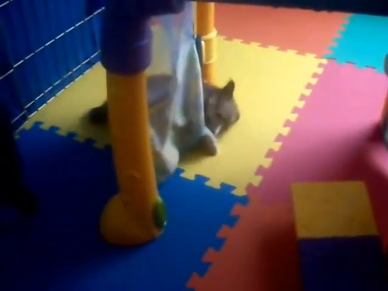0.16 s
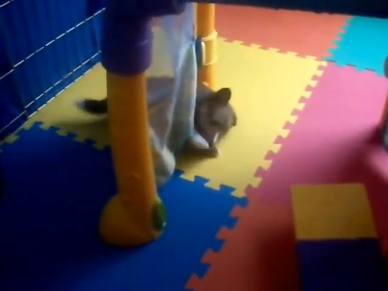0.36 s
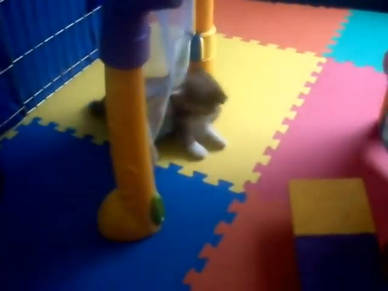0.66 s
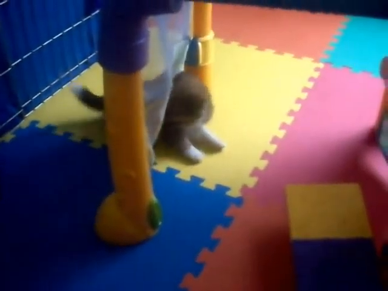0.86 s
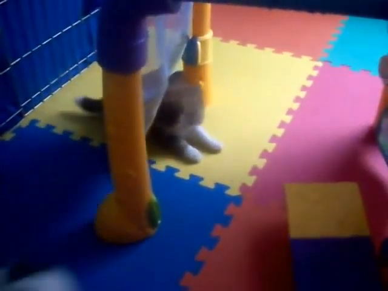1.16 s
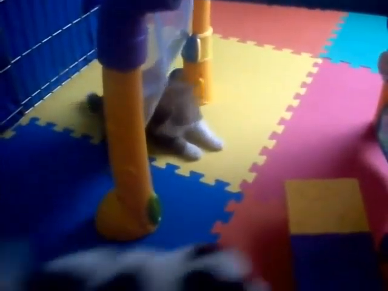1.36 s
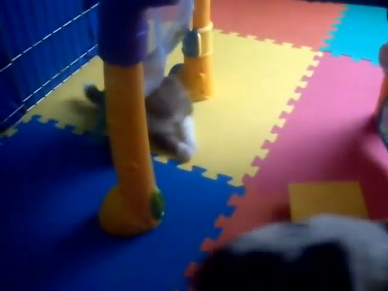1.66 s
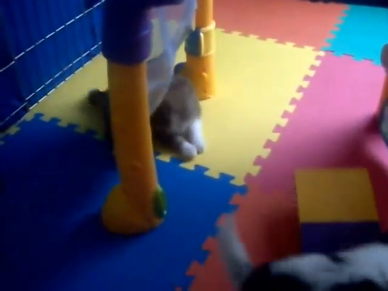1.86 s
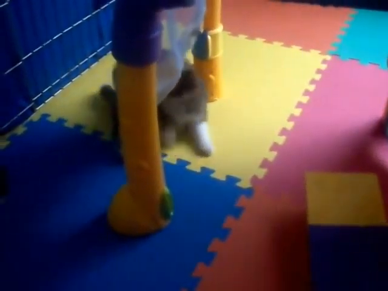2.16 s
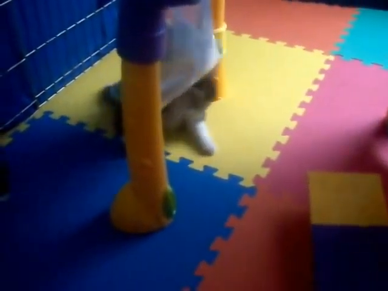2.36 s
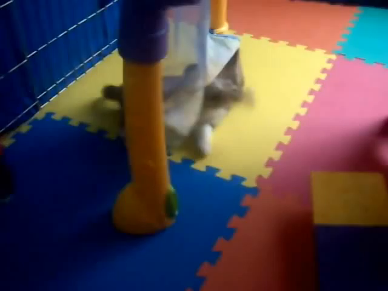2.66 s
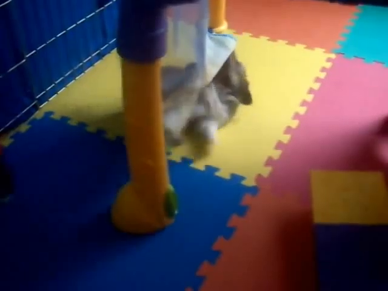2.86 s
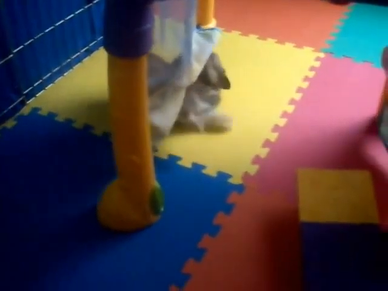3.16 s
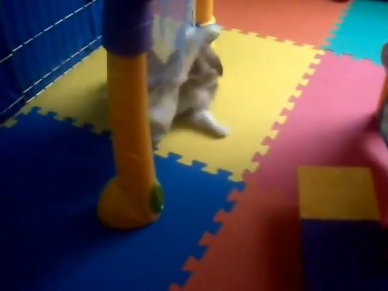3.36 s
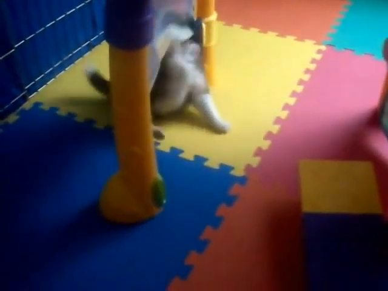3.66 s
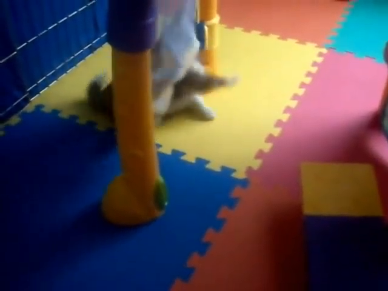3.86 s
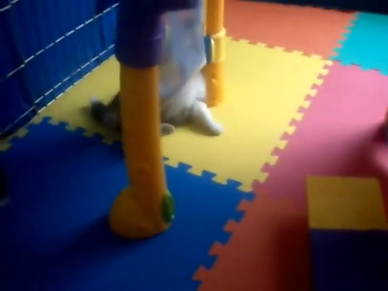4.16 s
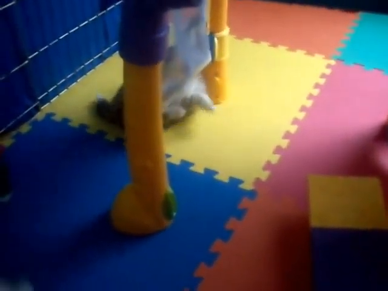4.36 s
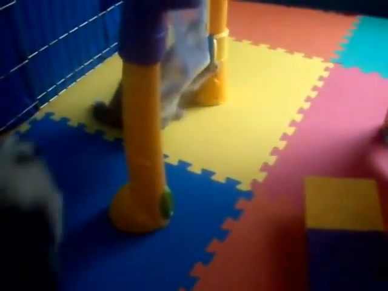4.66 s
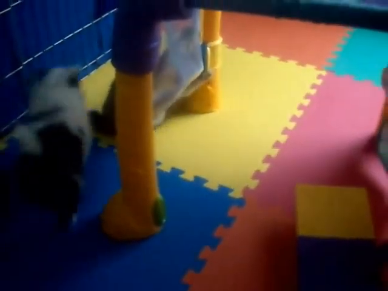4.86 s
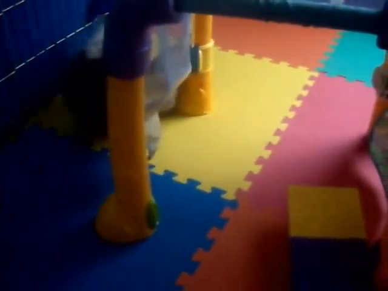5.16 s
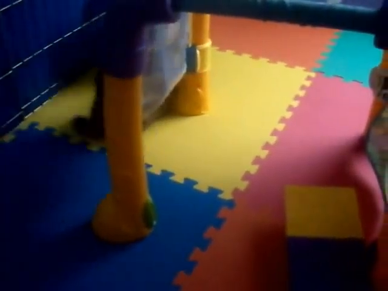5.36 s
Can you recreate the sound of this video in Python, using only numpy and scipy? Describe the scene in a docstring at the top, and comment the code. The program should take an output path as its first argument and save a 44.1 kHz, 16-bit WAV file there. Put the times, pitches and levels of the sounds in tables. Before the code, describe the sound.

Faint rubbing and light pats of paws on foam, a ringing metallic clink across the room, tiny squeaks of rubbed foam, then a sudden hollow double knock, by far the loudest sound. Cloth net rasps and snaps, a claw zips over mesh, and bumps follow in clusters before thinning out. Live indoor echo, low hiss in the microphone.

```python
"""Scuffing and pats of paws on foam mats in a small, bare room, then one clink of metal: puppies tussle.
Rubbing is noise made of tiny slips; pats and claw ticks are decaying showers of clicks.
Something hollow is knocked twice: filtered blows, sharp cracks and decaying sine modes.
Foam squeaks faintly (wandering sines), a cloth net on a plastic frame rasps, snaps and is zipped by a claw.
Dense wall echoes follow the contacts, over quiet room tone and microphone hiss (coloured noise) and a faint hum."""
import sys
import numpy as np
from scipy import signal
from scipy.fft import rfft, irfft
from scipy.io import wavfile
from scipy.ndimage import uniform_filter1d

SR = 44100
rng = np.random.default_rng(int(sys.argv[2]) if len(sys.argv) > 2 else 0)


def generate_wav(sig):
    """Save sig (samples, or channels by samples) to the path in sys.argv[1] as 16-bit PCM at SR."""
    pcm = np.round(np.clip(np.atleast_2d(sig).T, -1, 1) * 32767).astype(np.int16)
    wavfile.write(sys.argv[1], SR, pcm)


N = 242991  # samples


def undb(db):
    """Decibels to gain."""
    return 10 ** (np.asarray(db) / 20)


def unit(x):
    """Scale to rms 1."""
    return x / np.sqrt(np.mean(x ** 2) + 1e-20)


def on_log(hz, points):
    """Interpolate (f/Hz, value) points on a log-frequency axis."""
    point_hz, values = np.transpose(points)
    return np.interp(np.log(np.maximum(hz, 1)), np.log(point_hz), values)


def colour(x, points):
    """Shape a steady sound with the spectrum of the points, at rms 1."""
    gain = undb(on_log(np.fft.rfftfreq(len(x), 1 / SR), points))
    return unit(irfft(rfft(x) * gain, len(x)))


def impulse(points, size=2048):
    """Minimum-phase click with this spectrum, at energy 1."""
    magnitude = undb(on_log(np.fft.rfftfreq(size, 1 / SR), points))
    cepstrum = irfft(np.log(magnitude))
    # fold the cepstrum onto positive time: most compact causal click
    cepstrum[1:size // 2] *= 2
    cepstrum[size // 2 + 1:] = 0
    return unit(irfft(np.exp(rfft(cepstrum)))) / np.sqrt(size)


def fade(t60_s):
    """One second of exponential decay, falling 60 dB in t60_s."""
    return np.exp(-np.log(1000) * np.arange(SR) / SR / max(t60_s, 1e-3))


def burst(points, t60_s):
    """Contact as a decaying shower of tiny clicks, with the energy of 5 ms at rms 1."""
    shower = rng.standard_normal(SR) * fade(t60_s)
    return unit(signal.fftconvolve(shower, impulse(points))[:SR]) * np.sqrt(.005)


def ring(modes):
    """Decaying sine modes set off together, each reaching the microphone in its own phase."""
    t = np.arange(SR) / SR
    out = np.zeros(SR)
    for hz, db, t60_s in modes:
        out += undb(db) * fade(t60_s) * np.sin(2 * np.pi * (hz * t + rng.random()))
    return out


def add(out, start_s, x):
    """Mix x into out from start_s."""
    i = int(start_s * SR)
    out[i:i + len(x)] += x[:N - i]


def walk(rate_hz):
    """Random levels held 1 / rate_hz and smoothed twice; rms 1."""
    hold = int(SR / rate_hz)
    steps = np.repeat(rng.standard_normal(N // hold + 1), hold)
    return unit(uniform_filter1d(uniform_filter1d(steps, hold), hold)[:N])


# Room tone and hiss spectrum: f/Hz, level/(dB per Hz), relative
ROOM_TONE = [(15, -44), (25, -3.5), (119, -7), (188, -17.5), (240, -3), (281, -10.5), (582, -5), (648, 2),
             (703, -4.5), (1170, -5.5), (1750, -13.5), (2230, -13), (3260, -18.5), (13900, -23),
             (15500, -23.5)]
ROOM_TONE_DB = -62.5


def background(hum_hz=643, hum_db=-73, waver=0.01166):
    """Steady coloured noise for room tone and hiss, plus a faint sine hum wavering in pitch and level."""
    tone = undb(ROOM_TONE_DB) * colour(rng.standard_normal(N), ROOM_TONE)
    pitch_hz = hum_hz * (1 + waver * walk(25.17))
    hum = np.sin(2 * np.pi * np.cumsum(pitch_hz) / SR) * undb(hum_db + 2 * walk(5.63))
    return tone + hum


# Wall decay by frequency: f/Hz, t60/s
ROOM_T60 = [(100, 0.56), (500, 0.51), (2000, 0.59), (6000, 0.38), (15000, 0.58)]


def echoes(build_s=0.0015):
    """Dense wall echoes of one click, energy 1: built up within ms, decaying at a rate set by frequency."""
    spectrum, hz = rfft(rng.standard_normal(SR)), np.fft.rfftfreq(SR, 1 / SR)
    centres_hz = [f for f, _ in ROOM_T60]
    tail = np.zeros(SR)
    for share, (_, t60_s) in zip(np.eye(len(centres_hz)), ROOM_T60):
        band = irfft(spectrum * on_log(hz, list(zip(centres_hz, share))), SR)
        tail += band * fade(t60_s)
    build = 1 - np.exp(-(np.arange(SR) / SR / build_s) ** 2)
    return unit(tail * build) / np.sqrt(SR)


def room(x):
    """Wall response to x, with a fresh random echo pattern on each call."""
    return signal.fftconvolve(x, echoes())[:len(x)]


def strike(points, room_db, smear_hz=1000):
    """Clean blow (energy of 5 ms at rms 1) plus echoes, smeared by an all-pass."""
    x = np.zeros(SR)
    add(x, 0, impulse(points) * np.sqrt(.005 * SR))
    # bending waves travel at different speeds, which spreads the first peak
    _, poles = signal.iirpeak(smear_hz, 1, fs=SR)
    return signal.lfilter(poles[::-1], poles, x) + undb(room_db) * room(x)


# Rubbed-foam squeaks and scrapes: t/s, length/s, pitch f/Hz, pitch spread width/Hz, level/dB
SQUEAKS = [(.81, 0.11, 2424, 162.5, -66), (.865, 0.046, 2806, 257, -60.5), (.902, 0.051, 2580, 49.6, -55.5),
           (1.167, 0.043, 2300, 796, -54.5), (2.279, .22, 2421, 420, -63), (2.886, .033, 2790, 398, -58),
           (3.245, 0.037, 2400, 604, -60), (3.341, 0.083, 778, 299, -56)]


def squeaks(room_db=-5):
    """Rubbed foam sticks and slips: even slips give a thin note, uneven ones a rough scrape."""
    out = np.zeros(N)
    for start_s, length_s, pitch_hz, width_hz, db in SQUEAKS:
        n = int(length_s * SR)
        hz = pitch_hz + width_hz / 2 * walk(2 * width_hz)[:n]
        note = np.sqrt(2) * np.sin(2 * np.pi * np.cumsum(hz) / SR)
        add(out, start_s, undb(db) * np.hanning(n) * note)
    return out + undb(room_db) * room(out)


# Claw zipping over the net mesh, one event: t/s, length/s, thread rate/Hz, level/dB
ZIP = (3.9915, .013, 1000, -45)
# Spectrum of one plucked thread: f/Hz, level/(dB per Hz), relative
THREAD = [(400, -21), (900, -9), (2100, 2), (4000, 1), (6000, 0), (7000, -6), (8500, 3), (10500, -11),
          (12400, -9), (15000, -29.5)]


def claw_zip(room_db=-5):
    """Claw plucks one thread after another, unevenly and so fast that the ticks fuse."""
    start_s, length_s, rate_hz, db = ZIP
    out, n = np.zeros(N), int(length_s * SR)
    speed_hz = rate_hz * (1 + .06 * walk(rate_hz)[:n])
    plucks = np.diff(np.floor(np.cumsum(speed_hz) / SR), prepend=0)
    threads = unit(signal.fftconvolve(plucks, impulse(THREAD))[:n])
    add(out, start_s, undb(db) * np.hanning(n) * threads)
    return out + undb(room_db) * room(out)


# Net snapping taut or nicked by a claw: t/s, level/dB
SNAPS = [(2.587, -53.5), (2.781, -58), (3.258, -65), (3.284, -62), (3.92, -54.5), (4.077, -61),
         (4.215, -57.5), (4.82, -66)]
# Cloth spectrum, also the hiss of rubbing(): f/Hz, level/(dB per Hz), relative
CLOTH = [(1500, -28), (4500, -6), (6200, -2.5), (9000, 0.5), (11500, -7.5), (15000, -4)]


def snaps(t60_s=.03, room_db=-4):
    """Net cloth jerks: short, crisp noise bursts."""
    out = np.zeros(N)
    for start_s, db in SNAPS:
        add(out, start_s, undb(db) * burst(CLOTH, t60_s))
    return out + undb(room_db) * room(out)


# Light claw ticks: t/s, level/dB
TICKS = [(.822, -57), (1.019, -56.5), (1.115, -54.5), (1.18, -53.5), (2.297, -59), (4.443, -54.5)]
# Claw click spectrum, also in pats(): f/Hz, level/(dB per Hz), relative
CLAW = [(900, -25), (2100, 10), (3200, 3.5), (4500, 1.5), (7000, -12), (10000, -14), (15000, -18)]


def ticks(t60_s=0.042, room_db=-4):
    """Claw touches down with no weight behind it."""
    out = np.zeros(N)
    for start_s, db in TICKS:
        add(out, start_s, undb(db) * burst(CLAW, t60_s))
    return out + undb(room_db) * room(out)


def friction(points, slips_per_s, spread_db, flutter_db):
    """Many tiny slips of uneven size, coming in flurries; coloured, at rms 1."""
    sizes = undb(np.minimum(rng.exponential(size=N), 5) * spread_db)
    slips = rng.standard_normal(N) * (rng.random(N) < slips_per_s / SR) * sizes
    return colour(slips * undb(flutter_db * walk(70)), points)


# Rubbing strokes: peak t/s, nominal length/s, relative level/dB, net over foam/dB
STROKES = [(0.023, 0.13, -58, 1.5), (0.387, 0.29, -63, 4), (0.902, 0.28, -66, -2.5), (1.192, .06, -59, 3.5),
           (1.298, 0.23, -62.5, -1.5), (1.725, 0.097, -58, 5), (2.242, 0.12, -58, 0),
           (2.41, 0.12, -65.5, -15), (2.598, 0.24, -64.5, 13), (2.621, 0.095, -58.5, -11),
           (2.823, 0.25, -56, -10.5), (3.294, 0.081, -67.5, 12), (3.607, 0.17, -63, 12),
           (3.933, 0.085, -57, 3.5), (4.036, .11, -56, -0.5), (4.239, 0.1, -60.5, 6.5),
           (4.392, 0.057, -57.5, -3), (4.51, 0.11, -65.5, 9), (4.764, 0.13, -66, -15),
           (4.826, 0.025, -62.5, 7), (5.157, 0.32, -72, -9.5)]
# Foam scuff spectrum: f/Hz, level/(dB per Hz), relative
SCUFF = [(150, -12.5), (450, 1), (700, -1.5), (1250, 3), (1700, -8), (2400, -10), (3200, -47),
         (6000, -40.5)]
# Net rasp spectrum: f/Hz, level/(dB per Hz), relative
RASP = [(700, -12), (1500, -0.5), (2400, 3.5), (3200, -5), (4500, -5), (6500, -19.5), (12000, -34)]
RISE_SHARE = 0.46  # part of stroke length spent swelling
HISS_DB, HISS_DB_PER_NET_DB = -8, 1
# faint rubbing that never quite stops; levels before rub_db
FIDGET_DB, FIDGET_SWING_DB, FIDGET_RATE_HZ = -74.5, 2, 5.3


def rubbing(rub_db=-4, room_db=-2):
    """Strokes swell and die: bodies scuff foam; the more the net is caught, the more it rasps and hisses."""
    t = np.arange(N) / SR
    scuff = friction(SCUFF, 1500, 3, 2)
    rasp = friction(RASP, 2000, 2.7, 2)
    hiss = friction(CLOTH, 5000, 3, 1.2)
    fidget = undb(FIDGET_DB + FIDGET_SWING_DB * walk(FIDGET_RATE_HZ))
    out = fidget * (scuff + rasp + undb(HISS_DB) * hiss)
    for peak_s, length_s, db, net_db in STROKES:
        rise_s, fall_s = length_s * RISE_SHARE, length_s * (1 - RISE_SHARE)
        rising, falling = ((t - peak_s) / rise_s) ** 2, np.abs((t - peak_s) / fall_s) ** 1.5
        swell = np.exp(-np.where(t < peak_s, rising, falling))
        mix = undb(-net_db / 2) * scuff + undb(net_db / 2) * rasp
        mix += undb(HISS_DB + HISS_DB_PER_NET_DB * net_db) * hiss
        out += undb(db) * swell * mix
    return undb(rub_db) * (out + undb(room_db) * room(out))


# Paw pats and bumps against the frame: t/s, relative level/dB, pitch f/Hz, relative weight level/dB
PATS = [(.275, -47.5, 1120, -18), (.718, -52, 794, -11), (1.277, -52.5, 1130, -7),
        (1.471, -49.5, 1030, -12), (1.634, -51.5, 1270, -8), (1.701, -51, 1100, -18),
        (2.586, -47, 600, -11), (2.700, -46.5, 1100, -0.5), (2.784, -42, 1300, -1),
        (2.829, -45.5, 1230, -4), (2.990, -50.5, 1230, 0), (3.510, -50, 940, -10), (3.739, -51.5, 754, -9),
        (3.905, -48, 753, -3), (4.066, -43.5, 1280, -12), (4.360, -50.5, 1400, -7), (4.442, -43, 630, -9.5),
        (4.685, -48, 760, -8.5), (4.724, -52.5, 564, -3), (4.747, -45.5, 645, -5), (4.990, -59, 945, -8),
        (5.042, -54, 940, -17), (5.254, -55.5, 945, -22), (5.307, -53.5, 700, -10)]
# Soft slap spectrum: f/Hz, level/(dB per Hz), relative
PAD = [(150, -19), (380, -11.5), (520, -1), (850, 1), (1300, 0), (1700, -11.5), (2500, -18), (4000, -34.5)]
# Thump spectrum: f/Hz, level/(dB per Hz), relative
WEIGHT = [(40, -27), (90, -6), (160, 2), (250, -0.5), (380, 7.5), (600, 8.5), (1200, -47)]
PAT_T60_S, WEIGHT_DB_PER_DOUBLING = 0.041, 16.5  # decay at weight 0 dB; weight rise that doubles it
PAT_ROOM_DB, ROOM_DB_PER_WEIGHT_DB = 3, 0.25  # echo at weight 0 dB; its rise with weight
CLAW_DB, CLAW_DB_PER_OCTAVE, MIDDLE_HZ = -11.5, 7.5, 1000  # click at middle pitch; its rise with pitch


def pats(pat_db=-1, peak_db=6, peak_octaves=0.4):
    """Pitched slap, thump of weight and claw click; heavier pats last longer and stir the room more."""
    out, hz = np.zeros(N), np.geomspace(100, 8000, 60)
    for start_s, db, pitch_hz, weight_db in PATS:
        t60_s = PAT_T60_S * 2 ** (weight_db / WEIGHT_DB_PER_DOUBLING)
        click_db = CLAW_DB + CLAW_DB_PER_OCTAVE * np.log2(pitch_hz / MIDDLE_HZ)
        pitch_peak = np.exp(-(np.log2(hz / pitch_hz) / peak_octaves) ** 2)
        slap_db = on_log(hz, PAD) + peak_db * pitch_peak
        slap = burst(list(zip(hz, slap_db)), t60_s)
        thump = undb(weight_db) * burst(WEIGHT, t60_s)
        click = undb(click_db) * burst(CLAW, t60_s)
        pat = slap + thump + click
        echo_db = PAT_ROOM_DB + ROOM_DB_PER_WEIGHT_DB * weight_db
        add(out, start_s, undb(db + pat_db) * (pat + undb(echo_db) * room(pat)))
    return out


CLINK_S = .4016
# Thin metal modes: f/Hz, relative level/dB, t60/s
METAL = [(1004, -7, .55), (1128, -6, .55), (1263, -7, .5), (1895, -3, .35), (2062, -4, .33), (2406, -8, .3),
         (2850, 2, .04), (4570, -13, .3), (7849, -10, .32), (8000, -2, .32), (8032, -8, .25),
         (12400, -14, .3)]
# Tick spectrum: f/Hz, level/(dB per Hz), relative
TICK = [(120, -34), (260, -2.5), (600, -2.5), (1100, 7), (1600, -1), (2100, 3.5), (3000, -3), (4000, -5.5),
        (6200, -7.5), (8000, -6), (10500, -12.5), (13500, -10), (15500, -16)]


def clink(tick_db=-43, chatter_db=-41.0, ring_db=-47.5, room_db=5, chatter_t60_s=0.34, rebound_s=0.02,
          chatter_room_db=3):
    """Hard tick across the room sets thin metal ringing; it chatters as it swings back."""
    out, chatter = np.zeros(N), burst(TICK, chatter_t60_s)
    add(out, CLINK_S, undb(tick_db) * strike(TICK, room_db) + undb(ring_db) * ring(METAL))
    chatter_wet = chatter + undb(chatter_room_db) * room(chatter)
    add(out, CLINK_S + rebound_s, undb(chatter_db) * chatter_wet)
    return out


# Two knocks with rebounds: t/s, relative thud level/dB, contact time/ms, relative crack level/dB
KNOCKS = [(1.8430, 2.5, 0.71, -2), (1.8482, -5, 0.58, -21), (1.866, -19, 0.64, -6),
          (1.88, -7.5, 0.324, -8.5), (1.889, -7, 0.98, -18), (2.0220, -0.5, 0.17, -4),
          (2.0303, -2, 0.32, -26), (2.039, -13, 0.2, -23), (2.083, -11, 0.61, -36)]
# Onset of ringing per knock: t/s
RING_S = [1.8436, 2.0222]
# Hollow body modes, each knock on its own spot: f/Hz, relative level 1st/dB, 2nd/dB, t60/s
HOLLOW = [(81, -18, -22, .7), (97, -28, -17, .5), (172, -22, -18, .4), (282, -13, -12, .5),
          (327, -9, -13, .55), (479, 3.5, -1, .45), (511, -5, -14, .36), (527, -8, -7, .36),
          (591, -5, -9, .35), (684, -20, -11, .4), (749, -8, -12, .3), (773, -14, -7, .45),
          (813, -7, -14, .35), (850, -5, -1, .45), (877, 3, -12, .38), (895, -14, -3, .45),
          (914, -10, -4, .45), (968, -7, -16, .3), (1027, -16, -9, .45), (1095, -11, -7, .4),
          (1163, -15, -5, .36), (1243, -12, -6, .36), (1306, -15, -6, .38), (1351, -11, -14, .38),
          (1506, -11, -7, .42), (1787, -19, -21, .5), (2064, -17, -15, .4), (2261, -26, -17, .3),
          (2428, -16, -23, .45), (2482, -24, -17, .3)]
# Dense, quickly damped resonances: f/Hz, level/(dB per Hz), relative
THUD = [(35, -59), (65, -27), (130, -16), (200, -15.5), (290, -5.5), (390, -10.5), (520, 0.5), (660, -8),
        (860, 6.5), (1020, -4), (1500, -2.5), (1700, -12.5), (2550, -13), (3100, -24), (5000, -29),
        (15000, -58)]
# Sharp crack spectrum: f/Hz, level/(dB per Hz), relative
CRACK = [(300, -17), (1500, 14.5), (2400, 9.5), (3100, 5), (4000, 8.5), (6000, -0.5), (10000, -7.5),
         (15000, -13)]


def knocks(thud_db=-23, ring_db=-31.5, crack_db=-37, room_db=0, crack_room_db=1, crack_t60_s=0.028):
    """Two knocks on a hollow body, with rebounds; longer contact lowers the low-pass: a duller blow."""
    out = np.zeros(N)
    for start_s, db, contact_ms, sharp_db in KNOCKS:
        push = signal.butter(1, min(500 / contact_ms, SR / 3), fs=SR)
        thud = signal.lfilter(*push, strike(THUD, room_db))
        add(out, start_s, undb(db + thud_db) * thud)
        crack = burst(CRACK, crack_t60_s)
        crack_wet = crack + undb(crack_room_db) * room(crack)
        add(out, start_s, undb(sharp_db + crack_db) * crack_wet)
    for spot, start_s in enumerate(RING_S):
        modes = [(hz, dbs[spot], t60_s) for hz, *dbs, t60_s in HOLLOW]
        add(out, start_s, undb(ring_db) * ring(modes))
    return out


def scene():
    """Sum of all layers at one microphone."""
    foam_and_net = rubbing() + squeaks() + snaps() + claw_zip()
    contacts = pats() + ticks() + clink() + knocks()
    return (background() + foam_and_net + contacts)[None]


def record(dry):
    """Steep elliptic low-pass at 15.6 kHz cuts the top."""
    return signal.sosfilt(signal.ellip(10, .2, 70, 15600, fs=SR, output="sos"), dry)


dry = scene()
out = record(dry)
generate_wav(out)
```